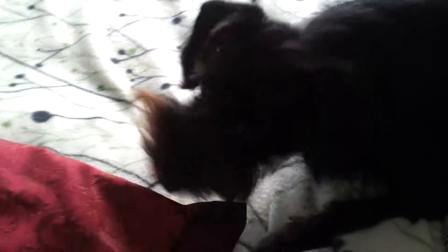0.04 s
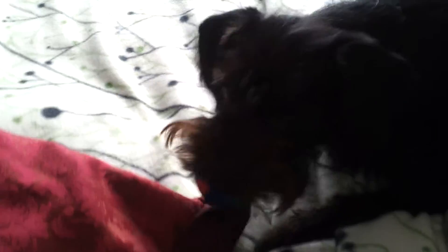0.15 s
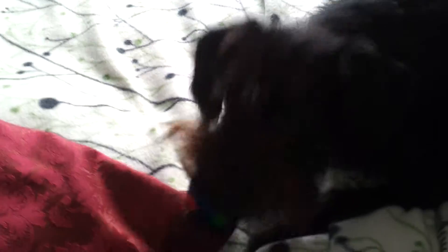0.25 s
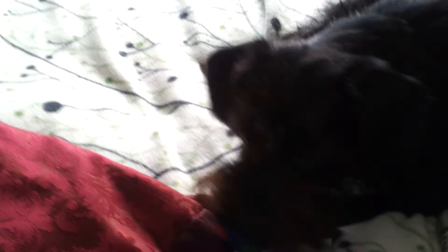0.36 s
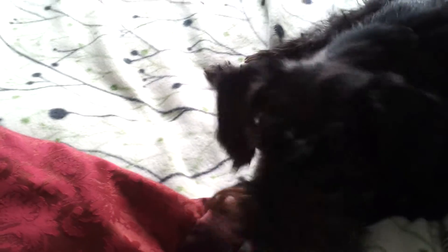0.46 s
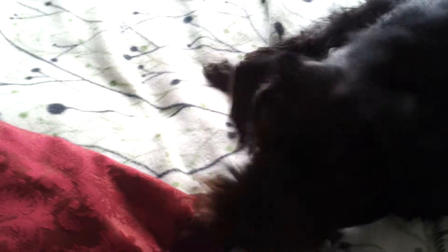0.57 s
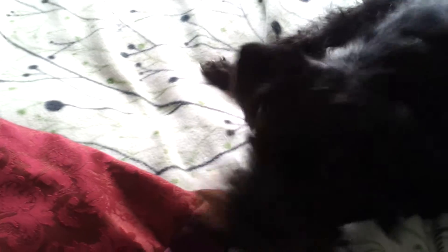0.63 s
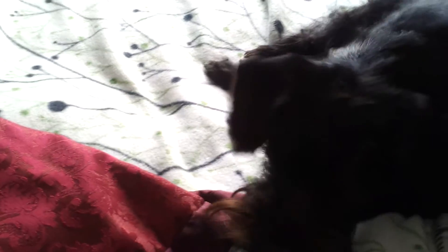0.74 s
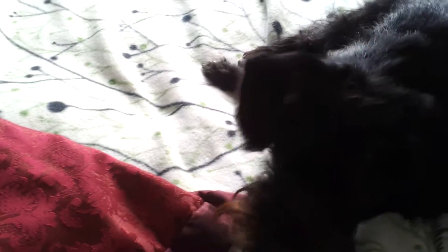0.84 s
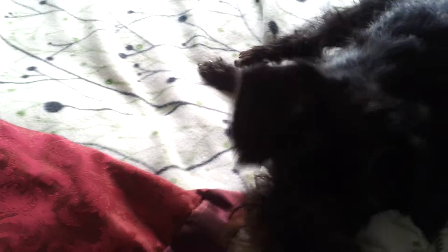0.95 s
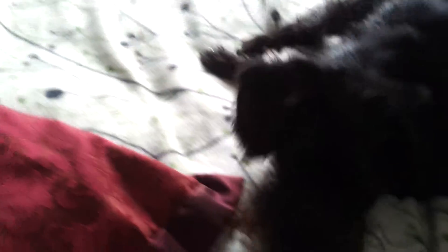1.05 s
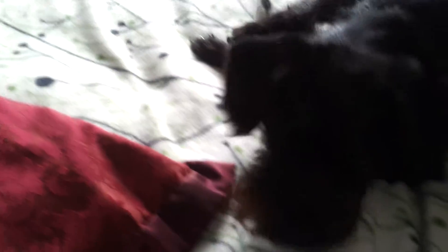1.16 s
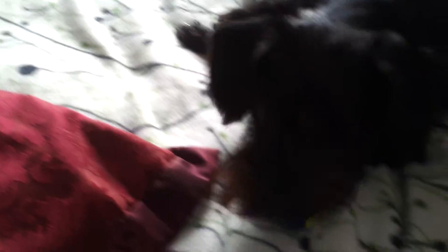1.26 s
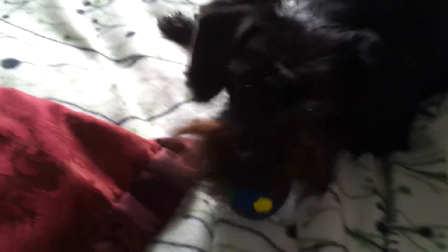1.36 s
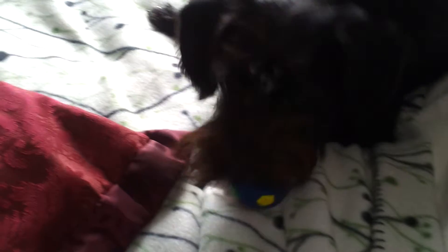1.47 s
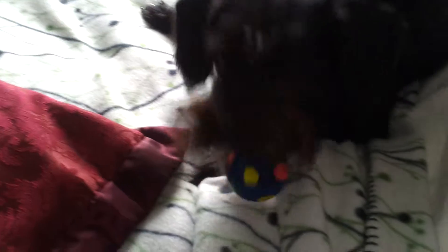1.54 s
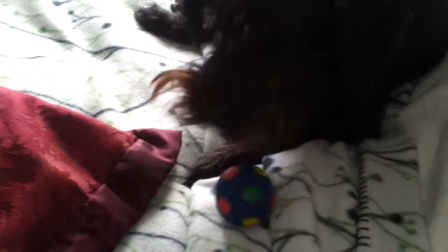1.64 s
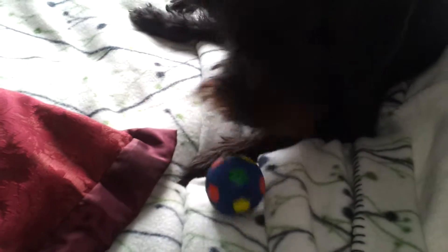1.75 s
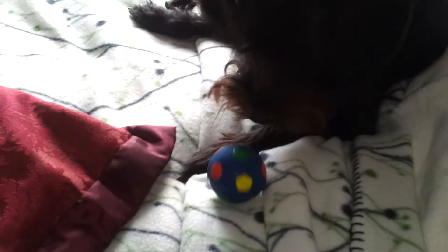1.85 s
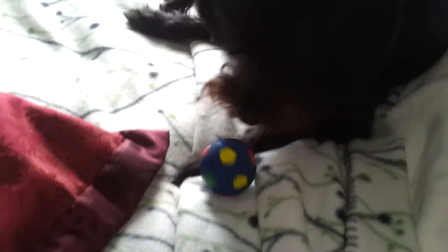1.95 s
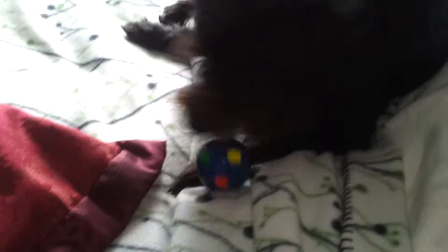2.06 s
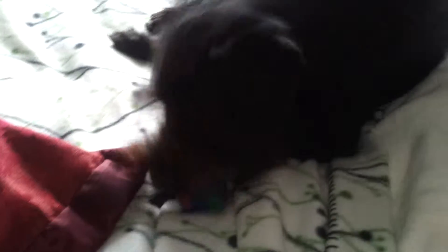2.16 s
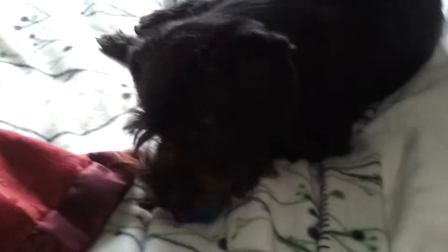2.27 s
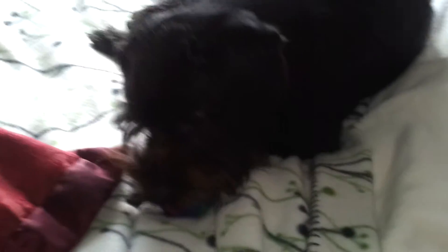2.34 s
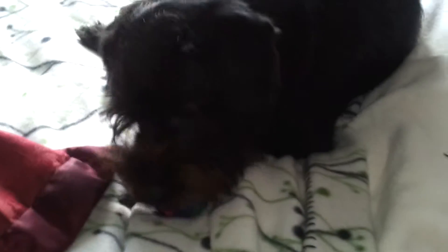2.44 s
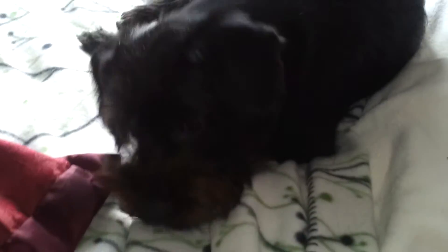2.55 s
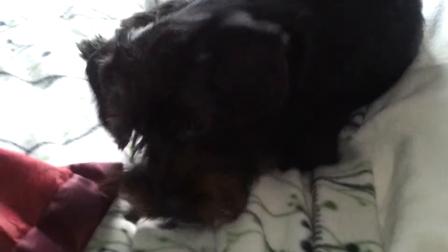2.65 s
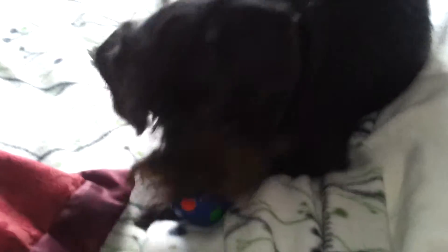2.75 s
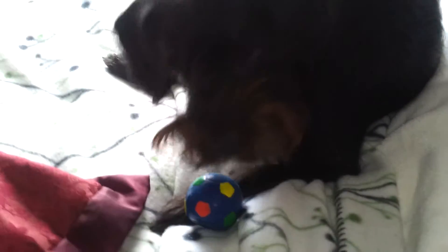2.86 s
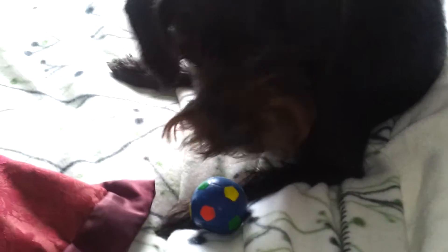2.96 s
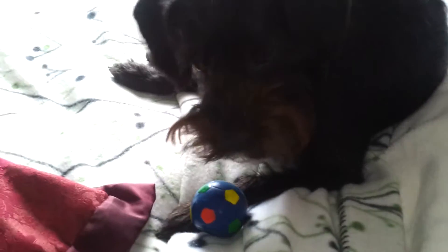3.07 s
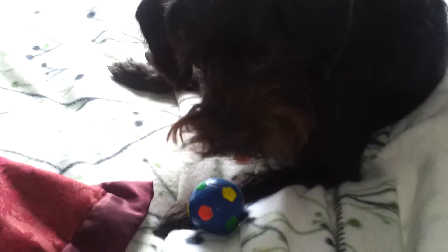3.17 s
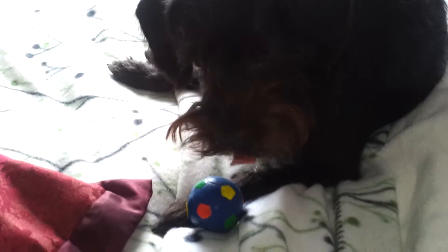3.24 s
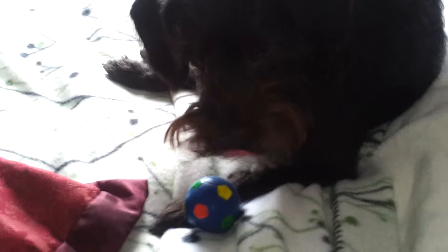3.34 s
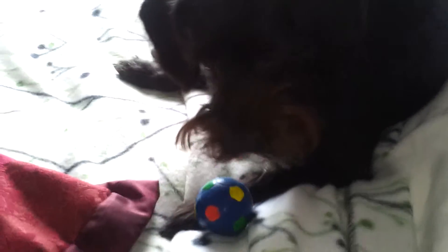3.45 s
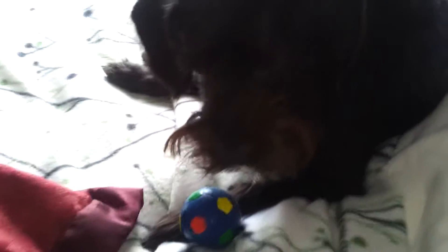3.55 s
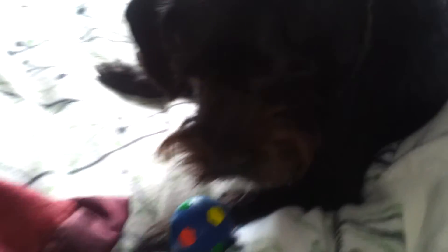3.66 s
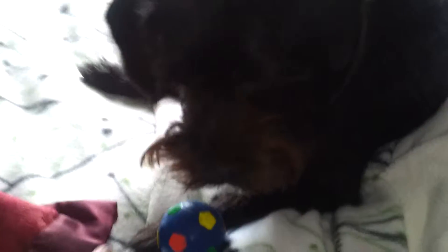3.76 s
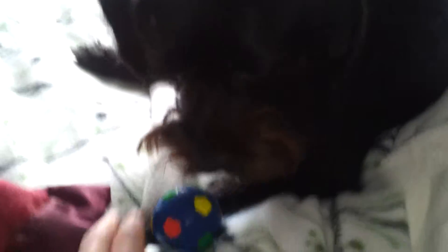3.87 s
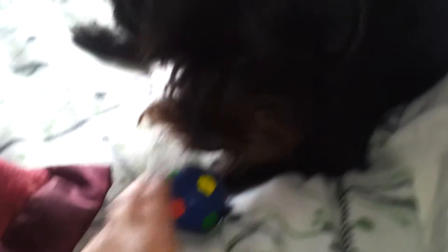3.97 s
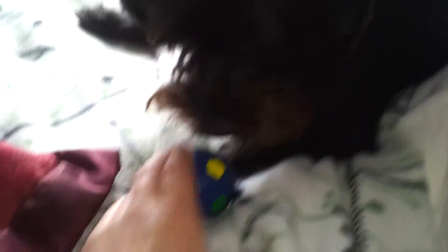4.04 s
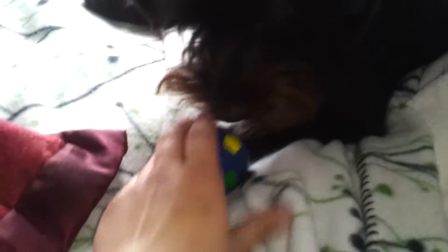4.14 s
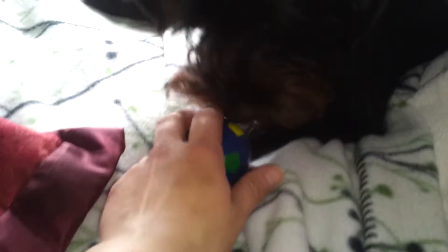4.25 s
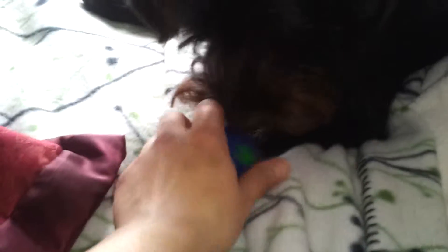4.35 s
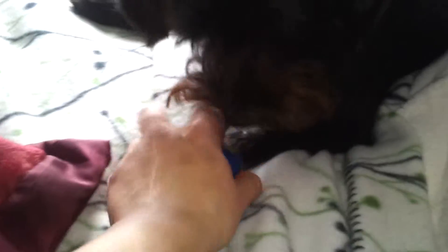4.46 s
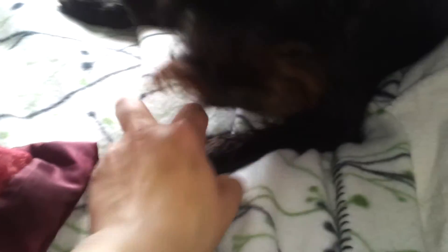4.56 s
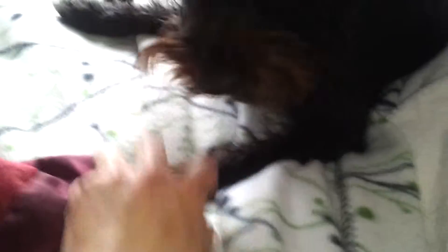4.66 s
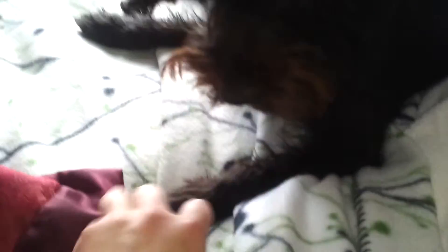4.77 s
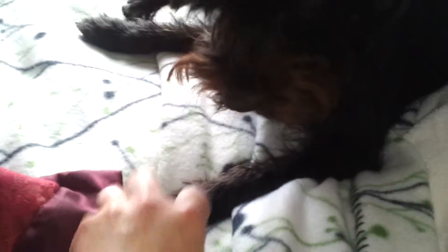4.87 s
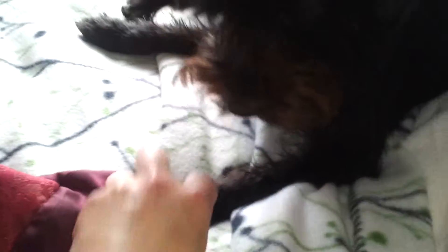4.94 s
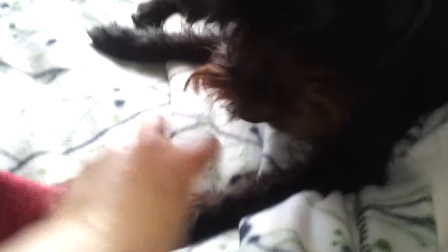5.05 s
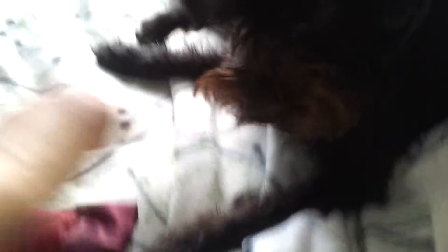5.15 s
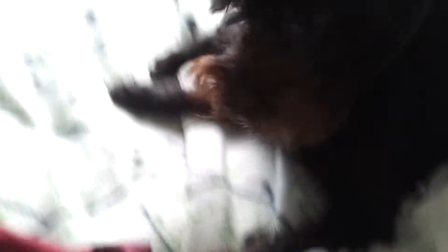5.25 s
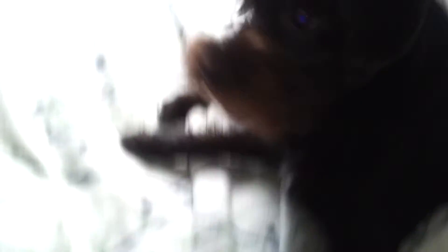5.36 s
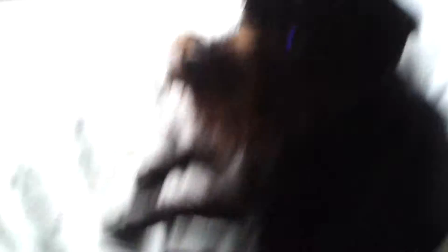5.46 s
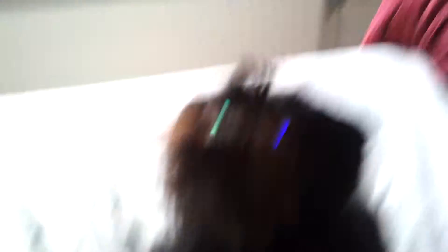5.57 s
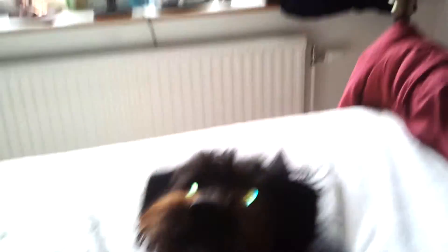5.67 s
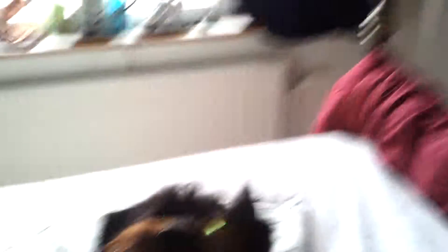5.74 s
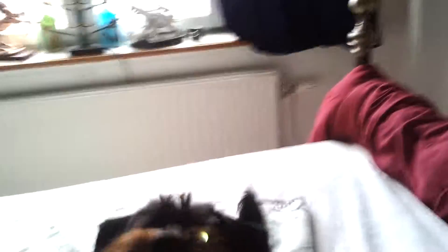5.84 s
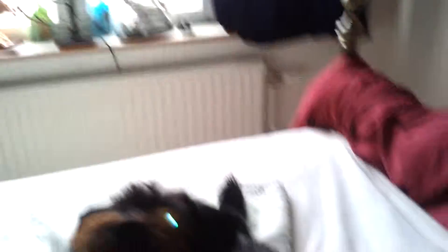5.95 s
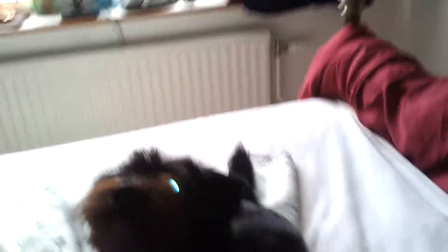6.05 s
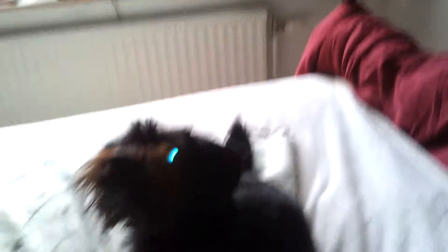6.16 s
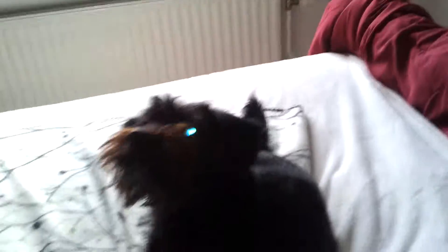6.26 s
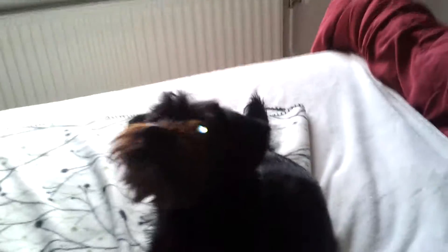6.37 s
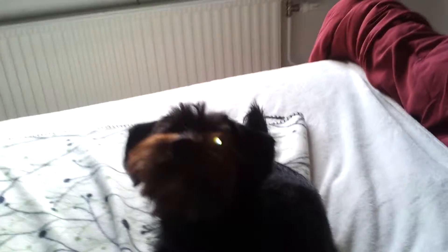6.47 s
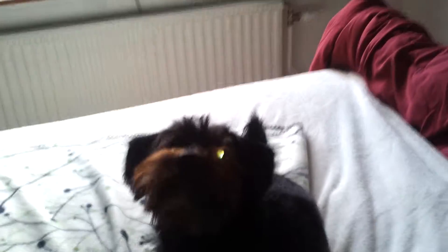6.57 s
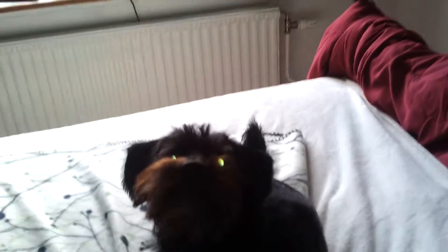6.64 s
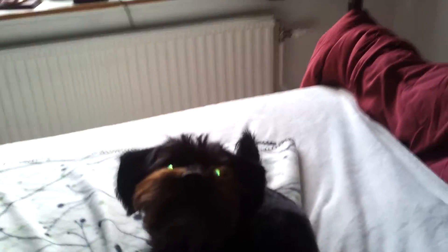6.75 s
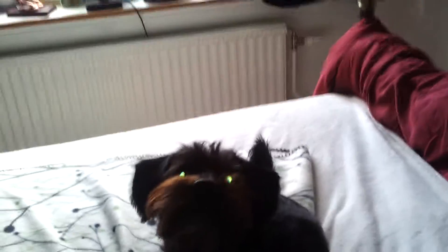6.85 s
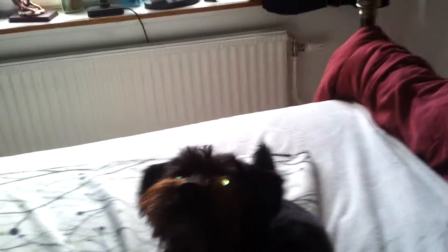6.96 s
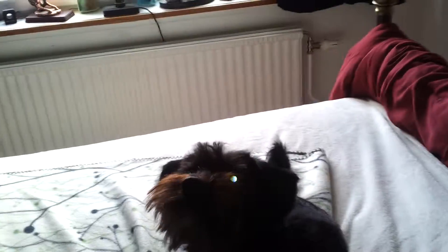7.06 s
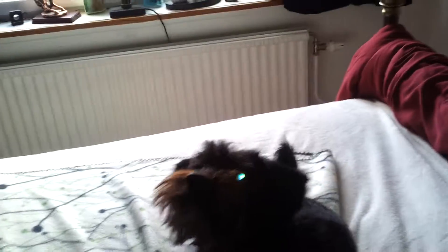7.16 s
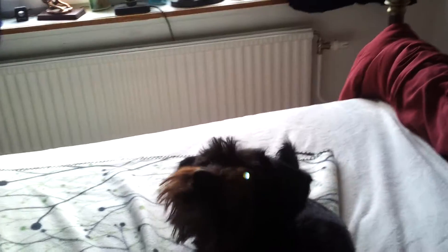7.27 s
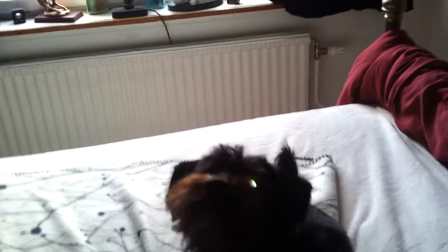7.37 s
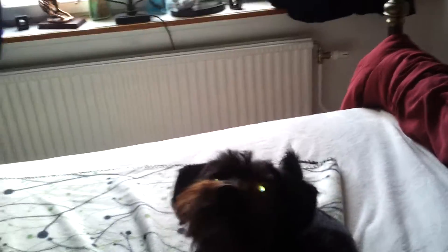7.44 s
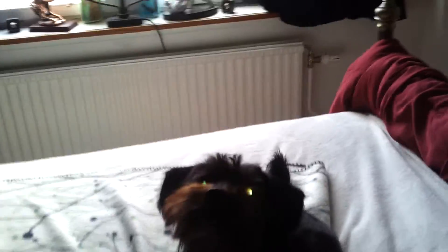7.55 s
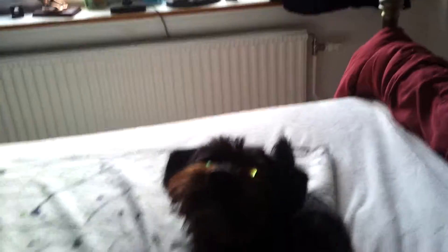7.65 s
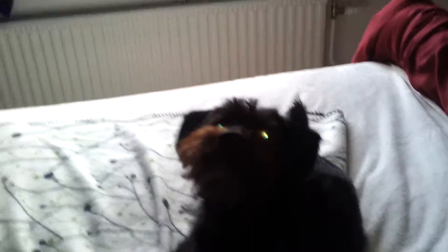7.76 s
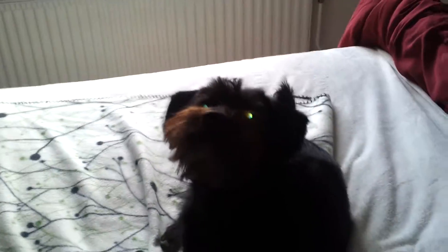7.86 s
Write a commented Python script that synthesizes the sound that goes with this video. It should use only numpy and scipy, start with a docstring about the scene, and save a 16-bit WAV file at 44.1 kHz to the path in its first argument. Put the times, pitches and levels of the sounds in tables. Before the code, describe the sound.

A squeaky rubber toy chirps rapidly under a dog's jaws, each squeak sagging in pitch at its end and some followed by a thin upward yelp of air. Muffled knocks and fur rustling accompany it. Nearly two quiet seconds follow, then hand-squeezed chirps return, somewhat roomier. The microphone is close, lacking deep bass, with soft steady background hiss and barely audible hum.

```python
"""Bedroom, close to a bed: a dog chews a small rubber squeaker ball; later a hand takes it and squeezes it.
Each crush presses air through a high reed, each refill draws it through a low one; both chop it into partials.
In between, jaws and paws bump ball and bedding and small ticks fall, all as short bursts of noise.
From first to last, shaped noise gives the rustle and hiss, slow-swaying sines the hum, and the room rings
briefly as a decaying noise response. The microphone loses the deep bass and the extreme top."""
import sys
import numpy as np
from scipy import signal
from scipy.fft import rfft, irfft, next_fast_len
from scipy.io import wavfile
from scipy.ndimage import uniform_filter1d, map_coordinates

SR = 44100
rng = np.random.default_rng(int(sys.argv[2]) if len(sys.argv) > 2 else 0)


def dump_mix(stems):
    """Bounce the given channels to the path in sys.argv[1] as a 16-bit WAV at rate SR."""
    frames = np.atleast_2d(stems).T  # one column per channel
    limited = np.clip(frames, -1, 1)  # hard clip at full scale
    pcm = np.round(limited * 32767).astype(np.int16)
    wavfile.write(sys.argv[1], SR, pcm)


N = 348831
TIME = np.arange(N) / SR

# Spectrum of the hiss behind everything: f/Hz, relative density/dB per Hz
HISS_SPECTRUM = [(24, -66), (40, -29), (80, -3.5), (117, -10), (192, -1.5), (287, -5), (325, -8),
                 (427, -5.5), (621, -10.5), (973, -4), (1220, -9), (1520, -8.5), (2270, -11.5),
                 (5440, -6.5), (15500, -27.5)]
# Faint hum and whine of an appliance: f/Hz, level before its sway/dB
HUM_LINES = [(91.5, -79), (137.5, -78.5), (183, -77), (953, -104), (1082, -75), (2046, -80)]
# Spectrum of fur and bedding: f/Hz, relative density/dB per Hz
RUSTLE_SPECTRUM = [(100, 3), (700, -22), (2400, 3), (3300, -18), (6000, 3), (9000, -14), (15000, -35)]
# The dog and the hand stir fur and bedding: t/s, half width/s, level/dB
STIRS = [(1.0, 0.84, -57), (2.285, .018, -43), (2.7, 0.98, -80), (4.45, .2, -73.5), (5.5, 1, -65),
         (6.65, 0.87, -58)]
# Share of room sound as the ball moves about: t/s, level/dB
ROOM_SHARE = [(0, -11), (.5, -18.5), (1.0, -14.5), (1.3, -20), (1.65, -15.5), (2.2, -15.5), (2.6, -18),
              (4.6, -20), (4.9, -14.5), (5.15, -19.5), (5.55, -13.5), (6.3, -8.5), (7.3, -11)]
# How long each band of the room rings: f/Hz, time to fall 60 dB/s
ROOM_T60 = [(200, 0.29), (1000, 0.42), (2200, 0.36), (5500, 0.4), (13000, 0.3)]
# Tone of the room: f/Hz, level/dB
ROOM_COLOUR = [(200, 22), (1200, 4.5), (2400, 10), (4200, 6.5), (7000, 2.5), (9000, 5), (13000, 7)]
# Soft bumps of jaws, paws and ball: t/s, level/dB, centre f/Hz, time to fall 60 dB/s
BUMPS = [(.27, -43.5, 275, 0.057), (0.496, -41, 247, 0.041), (1.026, -26.5, 367, 0.023),
         (1.028, -57, 170, 0.11), (1.029, -38, 774, 0.05), (1.329, -49, 212, 0.073),
         (1.342, -48.5, 117, .3), (1.38, -45, 171, 0.09), (1.385, -51, 410, 0.066),
         (1.617, -24, 710, 0.026), (1.616, -57, 220, 0.13), (2.165, -46, 785, 0.16),
         (2.696, -53, 500, 0.13)]
# Small sharp ticks: t/s, level/dB, time to fall 60 dB/s
TICKS = [(2.957, -42.5, 0.019), (3.846, -50, 0.08), (4.402, -48, .02), (4.417, -41, .015),
         (5.268, -23, 0.0079), (6.263, -49, .012), (6.587, -38, 0.021), (6.889, -51, 0.027)]
# Tone of each reed: f/Hz, partial level/dB
HIGH_REED_TONE = [(1200, -6), (2500, -3), (3800, -1), (5000, -9), (6300, -10), (7500, -10), (8700, -37.5),
                  (9700, -41.5), (11400, -22), (12700, -31.5), (14100, -32.5), (15300, -54)]
LOW_REED_TONE = [(1050, -7.5), (2100, -2.5), (3100, -10), (4300, 1), (5300, -8.5), (6400, -9), (7600, -18),
                 (9000, -28.5), (11200, -36), (13400, -38), (15200, -67)]
# Air pressed out through the high reed: start t/s, end t/s, rise/s, fall/s, held f/Hz, sag/Hz, final drop/Hz,
# base level/dB, swell/dB; then the cover of muzzle or hand: lift f/Hz, lift/dB, shade f/Hz, shade/dB, treble/dB
SQUEEZES = [ (0, 0.013, 0.0049, 0.013, 1257, 0, 71, -23.5, -13, 4040, 10.5, 7260, -4, 7),
            (.179, 0.285, 0.035, 0.049, 1310, 14, 207, -19, 5, 4500, -1, 2480, -7.5, 2),
            (0.374, 0.632, 0.044, 0.02, 1285, 40, 200, -20, -1, 7760, 0.5, 3570, -6.5, 3.5),
            (0.875, 1.04, 0.012, 0.0096, 1272, 55.5, 180, -24.5, 2.5, 2390, 5, 3760, -10.5, -11.5),
            (1.262, 1.355, 0.029, 0.013, 1269, 1.5, 60, -20, 3.5, 5600, 7, 4270, -9.5, -3),
            (1.565, 1.696, 0.0046, 0.066, 1264, -10.5, 216, -20, -2, 8350, 4.5, 1150, -5, 2),
            (2.437, 2.776, .018, 0.046, 1197, 4.5, 165, -26, 7, 900, 5, 7400, -1, 2),
            (4.722, 4.753, 0.001, 0.019, 1133, -2, 62, -28, -0.5, 7760, 15, 4360, -35, -34),
            (4.786, 4.967, .036, .09, 1188, -25, 255, -25, 1, 2030, 5, 2730, -11, -10),
            (5.444, 5.537, 0.013, 0.063, 1281, -13, 227, -16, -1, 3450, 6.5, 5660, -1, 4),
            (5.907, 5.956, 0.0045, 0.02, 1177, 11.5, 140, -23, 2, 3600, 3, 5600, -12, -1.5),
            (6.291, 6.334, 0.0022, 0.0077, 1105, 24.5, 11, -28, 2.5, 8250, 18.5, 890, 1.5, 0),
            (6.898, 7.004, 0.022, 0.047, 1312, 19, 172, -19.5, 3, 1100, 0, 2570, -1, 4.5)]
# The ball refills gently through the low reed: columns as for SQUEEZES
REFILLS = [ (0.043, 0.068, 0.004, .013, 1032, 16, 79, -22, 4, 3300, 3.3, 1880, -22, -21),
           (.103, 0.112, .007, .003, 1134, 0, 30, -29.5, 5, 1190, 20, 6990, -4, 19),
           (0.843, 0.856, 0.00073, 0.014, 1150, 2, 220, -29, 10, 5730, 6.3, 3830, -9, -10),
           (1.242, 1.249, .002, 0.0086, 1120, -2, 220, -25.5, -2, 5700, 8, 4250, -7, -13),
           (2.339, 2.4, .002, 0.015, 1031, 9, 94, -30.5, 0.5, 5750, 5.8, 3720, -5.5, -24),
           (4.552, 4.637, 0.0041, 0.0156, 1037, 39, 83, -24.5, -3.5, 4630, 5.1, 8200, -25, 1),
           (6.375, 6.395, 0.0046, 0.0087, 1023, 0, 30, -30.5, -4, 7800, 9.2, 4150, -15, 3),
           (7.029, 7.18, 0.0027, 0.025, 1050, 34, 110, -21.5, -5, 8460, 2.2, 1460, -14, -2.5)]
# The ball is let go and gasps through the low reed until it snaps back into shape: start t/s, end t/s,
# snap length/s, base f/Hz, level/dB, swell/dB, lift f/Hz, lift/dB, shade f/Hz, shade/dB, treble/dB
GASPS = [ (0.647, .685, 0.016, 1050, -26, -0.5, 7300, 5, 3730, -5.5, -21),
         (1.058, 1.096, 0.012, 1040, -26.5, 0, 6250, 8, 4200, -5.5, -29),
         (2.205, 2.221, 0.0076, 1027, -24.5, -2.5, 6040, 7.5, 4300, 1, -17),
         (5.064, 5.185, .017, 1064, -15.5, 7, 5460, 13, 1600, -9, -2),
         (5.566, 5.608, .012, 1042, -17.5, -1.5, 2920, 6, 1600, -7, 8),
         (6.006, 6.024, 0.0069, 1021, -22.5, -5, 3340, 8.5, 4900, 0.5, 10.5),
         (7.334, 7.37, 0.0095, 1041, -18.5, 1, 3420, 8.5, 1000, -6, 14.5)]
# Extra pushes of jaw or fingers that bend a sounding squeak upwards: t/s, half width/s, bend/Hz
PUSHES = [(0.499, 0.015, 49), (0.608, .013, 24), (1.31, 0.0058, 59), (1.619, 0.01156, 95),
          (2.338, 0.0074, 177), (2.486, .038, 62.6), (2.703, 0.02, 175.4), (4.826, 0.011, 154),
          (4.889, 0.0082, 143.4), (5.087, .015, 32), (7.064, .023, 105)]
# Overblowing during the snap, two single columns: share of the snap/1; pitch above the gasp's own/Hz
OVERBLOW_SHARES = [0, .35, .72, 1]
OVERBLOW_HZ = [0, 290, 360, 660]

HISS_DB, RUSTLE_REST_DB = -55.5, -60
RUSTLE_LUMPS_DB, RUSTLE_LUMPS_PER_S = 1.6, 30
LOW_CUT_HZ, CUTOFF_HZ = 50, 15700   # range of the microphone
# the room gathers sound from all directions, so it takes only this share of the cover's colour
COVER_IN_ROOM = 0.72
# a squeak starts flat by this share of its pitch, and loses so many dB for each Hz that it sags or drops
HIGH_SCOOP, HIGH_DB_PER_HZ = .1, .045
LOW_SCOOP, LOW_DB_PER_HZ = 0.067, 0.0049
SCOOP_DB = 4             # a squeak starts this much below its held level
PUSH_DB_PER_HZ = .009    # the reed is near its limit, so a push adds little level
PUSH_SHAPE = 1.244       # a push peaks sharply: 1 is a cusp, 2 a round hump
RELEASE_CURVE = 1.15     # the pressure lets go slowly at first
STALL_DB, STALL_S = 5.5, 0.014   # level lost as the pressure runs out, and its time constant
RUNAWAY_HZ, RUNAWAY_S = 141, 0.0132   # climb of a gasp just before the snap, and its time constant
FRAY_PER_DB = .12        # the pitch grows this much less steady for each dB that the level sags


def from_db(db):
    """Decibels to gain."""
    return 10 ** (np.asarray(db) / 20)


def rms_one(x):
    """Scale to unit rms."""
    return x / np.sqrt(np.mean(x ** 2) + 1e-20)


def at_hz(points, hz):
    """Read a table on a log-frequency axis."""
    points = np.array(points)
    return np.interp(np.log(hz + 1e-9), np.log(points[:, 0]), points[:, 1])


def coloured_noise(spectrum, size):
    """Noise with the given spectrum, rms 1."""
    hz = np.fft.rfftfreq(size, 1 / SR)
    white = rfft(rng.standard_normal(size))
    return rms_one(irfft(white * from_db(at_hz(spectrum, hz)), size))


def waver(t, per_s):
    """Smooth random wandering, of spread about 1, at the times t."""
    knots = rng.standard_normal(1024)
    return map_coordinates(knots, [(t - t[0]) * per_s], order=3, mode="mirror")


def bell(x, centre, width):
    """A smooth hump of height 1."""
    return np.exp(-((x - centre) / width) ** 2)


def hiss():
    """Soft, even noise with a fixed spectrum, behind everything."""
    return from_db(HISS_DB) * coloured_noise(HISS_SPECTRUM, size=next_fast_len(N))[:N]


def hum(sway_db=6.5, phase_drift=1.0):
    """Faint sine lines of an appliance, each drifting in phase (radians) and swaying in level."""
    total = 0
    for hz, level_db in HUM_LINES:
        phase = 2 * np.pi * hz * TIME + phase_drift * waver(TIME, per_s=1.63)
        level = from_db(level_db + sway_db * waver(TIME, per_s=3.085))
        total = total + np.sqrt(2) * level * np.sin(phase)
    return total


def rustle():
    """Fibres slide over each other in small uneven surges, more strongly at each stir."""
    stirs = sum(from_db(db) * bell(TIME, s, width_s) for s, width_s, db in STIRS)
    stirred = np.hypot(from_db(RUSTLE_REST_DB), stirs)
    lumps = from_db(RUSTLE_LUMPS_DB * waver(TIME, RUSTLE_LUMPS_PER_S))
    return stirred * lumps * coloured_noise(RUSTLE_SPECTRUM, size=next_fast_len(N))[:N]


def bedroom(x, first_echo_s=0.0053, early_gain=1.0, early_s=0.02):
    """Dense reflections, strongest from the bed and near walls; each band dies at its own rate."""
    t = TIME[:SR * 3 // 4]
    hz = np.fft.rfftfreq(len(t), 1 / SR)
    white = rfft(rng.standard_normal(len(t)))
    colour = from_db(at_hz(ROOM_COLOUR, hz))
    early = (t > first_echo_s) * (1 + early_gain * np.exp(-t / early_s))
    response = 0
    for k, (_, t60) in enumerate(ROOM_T60):
        # each band fades linearly (in log f) into its neighbours
        share = at_hz([(row[0], j == k) for j, row in enumerate(ROOM_T60)], hz)
        decay = early * from_db(-60 * t / t60)
        band = irfft(white * share * colour, len(t))
        response = response + band * decay / np.sqrt(np.sum(decay ** 2))
    return signal.fftconvolve(x, response)[:N]


def burst(s, level_db, centre_hz, t60, spread, rise_s):
    """A brief contact: a band of noise that swells quickly and dies."""
    t = TIME[:SR // 2]
    edges = np.clip([centre_hz / (1 + spread), centre_hz * (1 + spread)], 20, CUTOFF_HZ)
    band = signal.butter(2, edges, "band", fs=SR, output="sos")
    noise = rms_one(signal.sosfilt(band, rng.standard_normal(len(t))))
    sound = noise * (1 - np.exp(-t / rise_s)) * from_db(level_db - 60 * t / t60)
    return np.pad(sound, (round(s * SR), N))[:N]


def ticks():
    """Small sharp contacts: short, high bands of noise."""
    return sum(burst(s, db, centre_hz=6430, t60=t60, spread=0.12, rise_s=0.00022) for s, db, t60 in TICKS)


def bumps():
    """Soft contacts of jaws, paws, ball and bedding: lower bands of noise."""
    return sum(burst(s, db, hz, t60, spread=0.21, rise_s=0.0002) for s, db, hz, t60 in BUMPS)


def during(start_s, end_s):
    """The sample times of one squeak, and its progress from -1/2 to 1/2."""
    t = TIME[(TIME > start_s - .001) & (TIME < end_s + .002)]
    return t, np.linspace(-.5, .5, len(t))


def pushed_hz(t):
    """How far the extra pushes bend the pitch."""
    return sum(bend_hz * np.exp(-np.abs((t - s) / width_s) ** PUSH_SHAPE) for s, width_s, bend_hz in PUSHES)


def press(row, scoop, db_per_hz):
    """Pressure rises, holds, sags and falls; pitch and level follow. Returns times, pitch, level, cover."""
    start_s, end_s, rise_s, fall_s, held_hz, sag_hz, drop_hz, base_db, swell_db, *cover = row
    t, progress = during(start_s, end_s)
    hold_s = max(end_s - start_s - rise_s - fall_s, 1e-3)
    risen = np.clip((t - start_s) / rise_s, 0, 1)
    held = np.clip((t - start_s - rise_s) / hold_s, 0, 1)
    fallen = np.clip(1 + (t - end_s) / fall_s, 0, 1) ** RELEASE_CURVE
    scoop_hz = scoop * held_hz * (1 - risen)
    flat_hz = sag_hz * held + drop_hz * fallen
    push_hz = pushed_hz(t)
    pitch = held_hz - scoop_hz - flat_hz + push_hz
    # the reed falters as the pressure runs out
    stall_db = STALL_DB * fallen * np.exp(np.minimum(t - end_s, 0) / STALL_S)
    level_db = base_db + swell_db * progress - SCOOP_DB * (1 - risen)
    level_db += PUSH_DB_PER_HZ * push_hz - db_per_hz * flat_hz - stall_db
    return t, pitch, level_db, cover


def gasp(row):
    """The inrush runs away and overblows the reed as the wall pops out; returns the same as press()."""
    start_s, end_s, snap_s, base_hz, base_db, swell_db, *cover = row
    t, progress = during(start_s, end_s)
    since_snap = t - (end_s - snap_s)
    climb_hz = RUNAWAY_HZ * np.exp(np.minimum(since_snap, 0) / RUNAWAY_S)
    overblow_hz = np.interp(since_snap / snap_s, OVERBLOW_SHARES, OVERBLOW_HZ)
    pitch = base_hz + climb_hz + overblow_hz + pushed_hz(t)
    return t, pitch, base_db + swell_db * progress, cover


def cover_db(hz, cover, lift_width_hz=1000, shade_width_hz=1000):
    """Muzzle or hand around the ball lift one band, shade another and let more or less treble out."""
    lift_hz, lift_db, shade_hz, shade_db, treble_db = cover
    lift = lift_db * bell(hz, lift_hz, lift_width_hz)
    shade = shade_db * bell(hz, shade_hz, shade_width_hz)
    treble = treble_db * np.clip(hz / 5000 - 1, 0, 1)
    return lift + shade + treble


def squeak(blow, reed, jitter, flutter_db, dulling, stop_s, start_s=0.0017):
    """A reed chops air into partials; returns the sound sent straight ahead and that sent into the room."""
    t, pitch, level_db, cover = blow
    sag_db = level_db - level_db.max()
    fray = 1 - FRAY_PER_DB * sag_db
    pitch = uniform_filter1d(pitch, size=130) * (1 + jitter * fray * waver(t, per_s=400))
    phase = 2 * np.pi * np.cumsum(pitch) / SR
    k = np.arange(1, 17)[:, None]   # partial numbers
    partial_hz = k * pitch
    waves = np.sin(k * phase + rng.uniform(0, 2 * np.pi, k.shape)) * (partial_hz < CUTOFF_HZ)
    # as the pressure sags the reed closes less sharply and its upper partials fade first
    reed_db = at_hz(reed, partial_hz) + dulling * sag_db * np.log2(k)
    reed_db += flutter_db * np.array([waver(t, per_s=61.6) for _ in k])
    # the reed speaks only above a threshold pressure
    opening = np.minimum((t - t[0]) / start_s, (t[-1] - t) / stop_s)
    gate = np.sin(np.pi / 2 * np.clip(opening, 0, 1)) ** 2
    out = np.zeros((2, N))
    for path, covered in enumerate([1, COVER_IN_ROOM]):
        partials = from_db(reed_db + covered * cover_db(partial_hz, cover))
        # level the stack, so that the cover changes only its tone
        tone = np.sum(partials * waves, axis=0) / np.sqrt(np.sum(partials ** 2, axis=0) / 2)
        out[path, np.round(t * SR).astype(int)] = gate * from_db(level_db) * tone
    return out


def low_reed():
    """Air drawn in through the low reed, in gentle refills and in gasps."""
    intakes = [press(row, LOW_SCOOP, LOW_DB_PER_HZ) for row in REFILLS] + [gasp(row) for row in GASPS]
    return sum(squeak(blow, LOW_REED_TONE, jitter=0.0026, flutter_db=1.97, dulling=0.3, stop_s=.003)
               for blow in intakes)


def high_reed():
    """Air pressed out through the high reed as the ball is crushed."""
    blows = [press(row, HIGH_SCOOP, HIGH_DB_PER_HZ) for row in SQUEEZES]
    return sum(squeak(blow, HIGH_REED_TONE, jitter=0.0029, flutter_db=2.0, dulling=0.3, stop_s=0.0019)
               for blow in blows)


def scene():
    """Ball and small contacts, direct and by way of the room, over rustle, hiss and hum."""
    # the contacts go alike into the direct path and the room path
    direct, into_room = high_reed() + low_reed() + bumps() + ticks()
    room_share = from_db(np.interp(TIME, *np.transpose(ROOM_SHARE)))
    room = bedroom(into_room * room_share)
    return (direct + room + rustle() + hiss() + hum())[None]


def record(dry):
    """The microphone loses the deep bass, and the top is cut steeply."""
    low_cut = signal.butter(3, LOW_CUT_HZ, "high", fs=SR, output="sos")
    top_cut = signal.ellip(12, .1, 90, CUTOFF_HZ, fs=SR, output="sos")
    return signal.sosfilt(top_cut, signal.sosfilt(low_cut, dry))


dry = scene()
out = record(dry)
dump_mix(out)
```